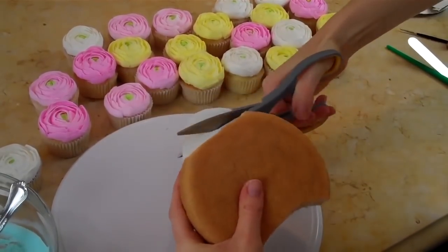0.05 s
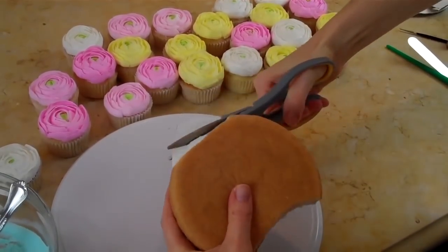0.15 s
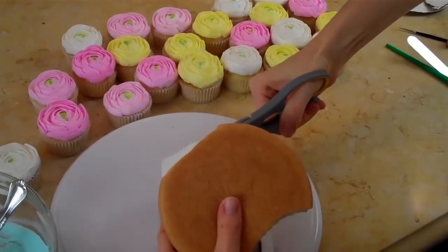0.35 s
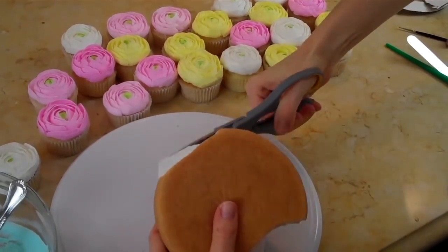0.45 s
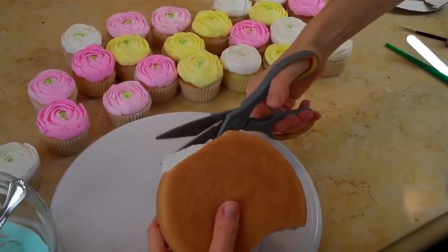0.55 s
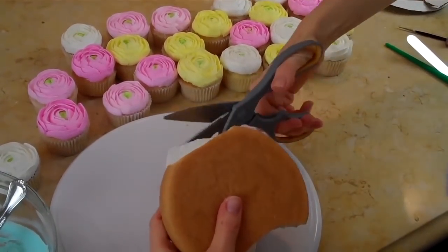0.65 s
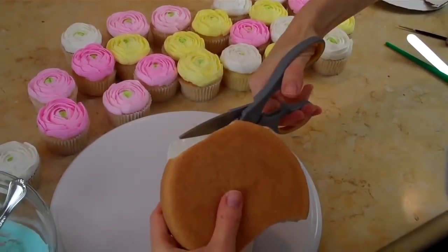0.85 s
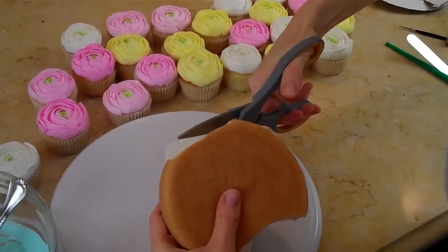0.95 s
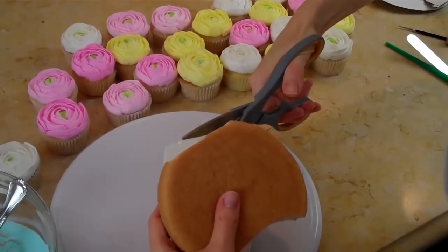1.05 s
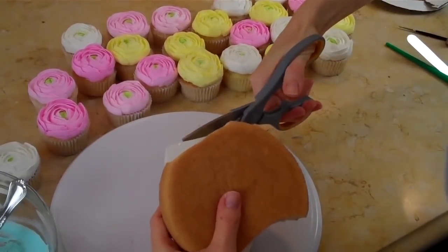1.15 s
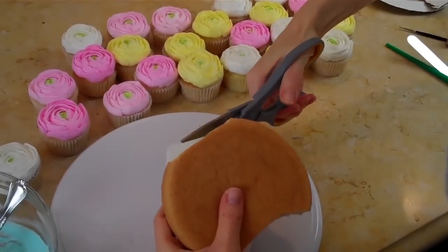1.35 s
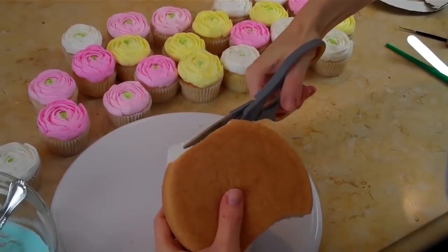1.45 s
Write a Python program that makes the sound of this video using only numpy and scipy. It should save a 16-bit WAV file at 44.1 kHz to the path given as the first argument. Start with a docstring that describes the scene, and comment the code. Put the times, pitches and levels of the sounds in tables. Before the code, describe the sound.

Scissors cut cardboard, close up in a softly humming, lightly reverberant kitchen. A faint crunch from the start grows into cracks and a bright scrape around 0.2-0.3 s, then a loud, sharp metallic clack at 0.32 s. The offcut tumbles onto a plastic platter with hollow knocks and papery scuffs until about 0.63 s. Sparse faint ticks follow, with quiet steely rubbing from 1.1 to 1.5 s.

```python
"""Scissors cutting cardboard

Scissors trim the cardboard under a cake, close by in a kitchen with a steady room tone.
Grains of noise make the crunch and scrape, short bursts the cracks, dying sines the flexing board.
A burst, a pulse and ringing modes clack the blades shut; the offcut knocks and scuffs a plastic platter.
Then faint ticks and nudges, and the rub of the scissors as they reopen and slide into the next cut."""
import sys
import numpy as np
from scipy import signal
from scipy.fft import rfft, irfft
from scipy.io import wavfile

SR = 44100
rng = np.random.default_rng(int(sys.argv[2]) if len(sys.argv) > 2 else 0)


def inscribe(sig):
    """Save sig as 16-bit PCM at rate SR to the path in sys.argv[1].

    A 1-D sig is mono; a 2-D sig holds one channel per row.
    Samples are clipped to [-1, 1] before scaling.
    """
    pcm = np.round(np.clip(np.atleast_2d(sig).T, -1, 1) * 32767)
    wavfile.write(sys.argv[1], SR, pcm.astype(np.int16))


N = 66150  # length of the scene [samples]
RADIATE_HZ = 370  # struck objects radiate little below this
SHARP_RISE_S = 0.00081  # onset of the clack, the scuffs and the ticks
PAPER_SPREAD_DB = 4  # unevenness of the grains in scuffs and ticks


def amp(db):
    """Decibels to gain."""
    return 10 ** (np.asarray(db) / 20)


def unit(x):
    """Scales to rms 1."""
    return x / np.sqrt(np.mean(x ** 2) + 1e-20)


def read(points, hz):
    """Reads a spectrum table on a log-frequency axis."""
    f, value = np.transpose(points)
    return np.interp(np.log(hz + 1), np.log(f + 1), value)


def bins(size=4096):
    """Frequencies on which colours are drawn."""
    return np.fft.rfftfreq(size, 1 / SR)


def add(mix, s, sound):
    """Mixes a sound in at a time."""
    part = mix[..., max(round(s * SR), 0):][..., :sound.shape[-1]]
    part += sound[..., :part.shape[-1]]


def no_bass(x, hz, order=4):
    """High-pass; the order sets its steepness."""
    return signal.sosfilt(signal.butter(order, hz, "high", fs=SR, output="sos"), x)


def colour(x, db):
    """Causal minimum-phase filter of unit energy with the given dB shape."""
    log_gain = np.log(amp(np.r_[db, db[-2:0:-1]]))
    spectrum = np.exp(np.conj(signal.hilbert(log_gain)))
    taps = np.fft.ifft(spectrum).real[:len(db)]
    return signal.fftconvolve(x, taps[None] / np.linalg.norm(taps), axes=1)


def uneven_noise(size, spread_db, most):
    """Common and side noise whose grains vary in size by an exponential draw, capped at most."""
    draw = np.minimum(rng.exponential(1, (2, size)), most)
    return rng.standard_normal((2, size)) * amp(spread_db * draw)


def fibres(size):
    """Two dense trains of tiny snaps of uneven size: the common part and the side part."""
    snaps_per_s, spread_db = 13000, -0.5
    happens = rng.random((2, size)) < snaps_per_s / SR
    return unit(uneven_noise(size, spread_db, 3) * happens)


def stroke(levels, shape):
    """Friction grains under a level curve, coloured by the rubbing surfaces."""
    s, db = np.transpose(levels)
    gain = amp(np.interp(np.arange(N) / SR, s, db))
    return colour(fibres(N) * gain, read(shape, bins()))[:, :N]


def burst(length, rise_s, fade_s, db, spread_db=0, size=2048):
    """A quick cluster of snaps: it rises, holds and fades."""
    t = np.arange(size) / SR
    envelope = np.minimum(t / rise_s, 1) * np.exp(-np.maximum(t - length, 0) / fade_s)
    x = uneven_noise(size, spread_db, 4) * envelope
    energy_match = np.linalg.norm(envelope) / np.linalg.norm(x, axis=1, keepdims=True)
    return amp(db) * x * energy_match


def bursts(rows, shape, rise_s, fade_s, peak_db, octaves, spread_db=0):
    """Short bursts of a shared colour, each with its own broad resonance."""
    out = np.zeros((2, N))
    for s, length, db, hz in rows:
        distance = np.log2((bins() + 1) / hz) / octaves
        peak = peak_db * np.exp(-.5 * distance ** 2)
        snap = burst(length, rise_s, fade_s, db, spread_db)
        add(out, s, colour(snap, read(shape, bins()) + peak))
    return out


def ring(modes):
    """Dying sines of a struck object too small to radiate bass."""
    t = np.arange(SR // 2) / SR
    sines = sum(amp(db - 60 * t / t60) * np.sin(2 * np.pi * hz * t) for hz, db, t60 in modes)
    return no_bass(sines, RADIATE_HZ)


def hush():
    """Steady room tone: coloured noise, partly different in the two ears."""
    # colour of the room tone: (frequency [Hz], level [dB])
    hush_colour = [(10, 4), (25, 6), (60, -4.5), (150, -4.5), (350, -5), (520, 6), (680, -4.5),
                   (1500, -5.5), (4000, -9), (8000, -17.5), (14000, -33.5)]
    level_db, side_db = -65.5, -4.5
    noise = rng.standard_normal((2, N + SR))
    # the first second is dropped so that the filter has settled
    mid, side = amp(level_db) * colour(noise, read(hush_colour, bins()))[:, SR:SR + N]
    return np.array([mid + amp(side_db) * side, mid - amp(side_db) * side])


def crunch():
    """The blades crunch through the fibres: snap noise follows the force on the board."""
    # force of the blades on the board: (time [s], level [dB])
    shear = [(0, -45), (.045, -46), (.1, -56.5), (.15, -53), (.2, -52), (.218, -42.5), (.24, -53),
             (.262, -48.5), (.283, -52), (.3, -72), (.33, -86)]
    # colour of the crunch: (frequency [Hz], level [dB])
    crunch_colour = [(100, -18), (300, -6), (550, 2), (1500, -1), (3000, 3), (5000, -2.5), (6500, -6),
                     (9000, -4), (12000, -15), (14500, -26.5)]
    return stroke(shear, crunch_colour)


def cracks():
    """The board cracks under the blades in short resonant bursts."""
    # cracks: (time [s], length [s], level [dB], brightest frequency [Hz])
    crack_rows = [(.1212, 0.0047, -45, 7260), (.158, 0.0045, -53.5, 3020), (.1743, 0.0018, -36.5, 3150),
                  (.1922, 0.0034, -41.5, 3350), (.203, 0.0069, -29, 5570), (.2054, 0.00058, -21.5, 3100),
                  (.2253, 0.0014, -30.5, 6800), (.3152, 0.0012, -26.5, 4025), (.3175, 0.0049, -21.5, 5900)]
    # colour of a crack: (frequency [Hz], level [dB])
    crack_colour = [(80, -33), (400, -10.5), (950, -5), (1400, -6.5), (2300, -5.5), (3300, 1), (4500, -3),
                    (7000, -3.5), (10000, -6.5), (13000, -14), (15000, -19)]
    return bursts(crack_rows, crack_colour, rise_s=0.00057, fade_s=0.0034, peak_db=6, octaves=0.28)


def scrape():
    """The edges scrape through the board, slipping in a narrow band of friction noise."""
    # scrape: (time [s], level [dB])
    scrape_levels = [(.2, -67.5), (.215, -41.5), (.24, -37), (.257, -43), (.263, -47), (.27, -42),
                     (.28, -43), (.296, -48.5), (.315, -83)]
    # colour of the scrape: (frequency [Hz], level [dB])
    scrape_colour = [(500, -39), (3500, -17), (5100, -2), (6500, -10.5), (10000, -10.5), (14000, -23.5)]
    return stroke(scrape_levels, scrape_colour)


def short_rings():
    """Short dying sines with a soft onset: the board flexes as it splits, then the clacking blades ring."""
    # flexes of the board and, in the last row, a quick 2.6 kHz ring of the clacking blades:
    # (time [s], pitch [Hz], level [dB], t60 [s])
    ring_rows = [(0.2045, 938, -27, 0.049), (0.2066, 1134, -34, 0.025), (0.3223, 1960, -7, .011),
                 (0.3245, 2620, -11, 0.011)]
    rise_s = 0.002
    out = np.zeros((2, N))
    t = np.arange(SR // 2) / SR
    for s, hz, db, t60 in ring_rows:
        add(out[0], s, ring([(hz, db, t60)]) * np.minimum(t / rise_s, 1))
    return out


def clack():
    """The blades clack shut: a bright burst, a brief pressure push and the ringing of the scissors."""
    # colour of the clack: (frequency [Hz], level [dB])
    clack_colour = [(40, -22), (450, -16), (800, -8.5), (1200, 0.5), (1500, -3), (2600, 4), (3200, -2.5),
                    (3900, 6.5), (4700, -1), (6300, -3.5), (7400, 1.5), (8900, -5.5), (10200, 1),
                    (12000, -7.5), (14500, -37)]
    # ringing of the scissors: (frequency [Hz], level [dB], t60 [s])
    blades = [(790, 3, .09), (1200, -5, .05), (2010, -1, .1), (2692, -2, .08), (3801, -7, .2),
              (3942, 1, .06), (5188, -3, .07), (5578, -3, .07), (6965, -4, .07), (7605, -5, .11),
              (8317, -10, .12), (9625, -6, .1)]
    shut_s, ring_db = .3241, -35.5
    push_width_s, push_db, push_side_db = 0.00013, -31.5, -4
    out = np.zeros((2, N))
    snap = burst(0.0025, SHARP_RISE_S, fade_s=0.00054, db=-11.8)
    add(out, shut_s, colour(snap, read(clack_colour, bins())))
    add(out[0], shut_s, amp(ring_db) * ring(blades))
    t = np.arange(SR // 2) / SR
    push = t / push_width_s * np.exp(1 - t / push_width_s)
    add(out, shut_s, amp(push_db) * np.array([push, -amp(push_side_db) * push]))
    return out


def knocks():
    """Each landing gives a short hollow knock, pitched by where the card strikes, and rings the platter."""
    # knocks as the offcut tumbles and settles: (time [s], level [dB], pitch [Hz], rise [s])
    knock_rows = [(.3675, -30, 575, 0.00074), (.3745, -29.5, 485.5, 0.0051), (.406, -42, 535, 0.0018),
                  (.4145, -29.5, 560, 0.0041), (.4485, -30.5, 557, 0.0052), (.478, -42.5, 494, .003),
                  (.5392, -35.5, 589, 0.00042), (.5555, -37.5, 548, 0.0037), (.5615, -30.5, 566.4, 0.0031),
                  (.6262, -47, 595, 0.00096), (.8262, -52.5, 551, .002), (1.311, -56, 585, .002)]
    # ringing of the platter: (frequency [Hz], level [dB], t60 [s])
    platter_modes = [(367, -14, 0.071), (489.6, -20, 0.12), (533, -31.5, 0.11), (658, -22.5, 0.085),
                     (767, -12.5, 0.092), (1005, -18.5, 0.12), (1247, -13, 0.055)]
    knock_t60_s = .052
    out, platter = np.zeros((2, N)), ring(platter_modes)
    t = np.arange(len(platter)) / SR
    for s, db, hz, rise_s in knock_rows:
        hollow = ring([(hz, 0, knock_t60_s)])
        add(out[0], s, amp(db) * np.minimum(t / rise_s, 1) * (hollow + platter))
    return no_bass(out, RADIATE_HZ)


def scuffs():
    """The edges of the tumbling card scuff the platter in crisp, papery grains."""
    # scuffs: (time [s], length [s], level [dB], brightest frequency [Hz])
    scuff_rows = [(.376, 0.00085, -39, 5040), (.384, 0.0012, -34.5, 5800), (.387, .001, -34, 2000),
                  (.4063, 0.0014, -34, 2350), (.41, 0.0024, -39, 3160), (.422, 0.0025, -38.5, 2180),
                  (.4442, 0.0032, -31.5, 2100), (.446, 0.00072, -33.5, 4770), (.4502, 0.00146, -34.5, 2770),
                  (.4535, 0.0007, -47, 3400), (.459, 0.0023, -39.5, 2960), (.47, 0.0033, -52, 2600),
                  (.5157, 0.0025, -48.5, 2630), (.5393, 0.0019, -39, 7150), (.556, 0.0032, -43, 2210),
                  (.5607, 0.0037, -42.5, 2700), (.5675, .001, -37.5, 2400), (.573, 0.0085, -48.5, 2430),
                  (.6093, 0.00057, -51, 2330), (.627, .001, -49.5, 5580)]
    # colour of a scuff: (frequency [Hz], level [dB])
    scuff_colour = [(80, -39), (250, -17), (550, -5.5), (900, 1.5), (1250, 6.5), (1500, 1.5), (2000, 8),
                    (3000, 2), (5000, 3), (9000, -10.5), (14000, -27)]
    return bursts(scuff_rows, scuff_colour, SHARP_RISE_S, fade_s=0.0023, peak_db=7.5, octaves=0.42,
                  spread_db=PAPER_SPREAD_DB)


def ticks():
    """Small ticks of the board and the handles: faint bursts with a strong broad resonance."""
    # ticks: (time [s], length [s], level [dB], brightest frequency [Hz])
    tick_rows = [(.728, 0.0019, -56.5, 3030), (.7525, 0.0023, -58, 3260), (.757, .002, -67, 3470),
                 (.8052, 0.0024, -60.5, 7880), (.8262, 0.0017, -54.5, 3250), (.8305, 0.0016, -58, 2730),
                 (.872, 0.003, -60, 3480), (.931, 0.0012, -60.5, 3450), (.9655, .003, -64, 3060),
                 (.973, .001, -60, 3000), (.995, 0.0016, -64.5, 2510), (1.078, 0.0015, -63.5, 6800),
                 (1.0935, .0015, -58, 2950), (1.137, 0.0028, -57, 1500), (1.1555, 0.0012, -55, 1800),
                 (1.39, 0.0013, -56.5, 6130), (1.434, 0.0018, -55, 10300), (1.4645, .0035, -52.5, 9500)]
    # colour of a tick: (frequency [Hz], level [dB])
    tick_colour = [(100, -9), (550, -8), (1000, 14.5), (4000, 3.5), (9000, -3.5), (14000, -13)]
    return bursts(tick_rows, tick_colour, SHARP_RISE_S, fade_s=.0015, peak_db=26.5, octaves=0.84,
                  spread_db=PAPER_SPREAD_DB)


def nudges():
    """The blades nudge the board and set its modes ringing."""
    # nudges: (time [s], level [dB])
    nudge_rows = [(.8055, -59.5), (1.136, -58), (1.145, -56.5), (1.157, -59), (1.272, -59.5),
                  (1.334, -59.5)]
    # ringing of the board: (frequency [Hz], level [dB], t60 [s])
    board_modes = [(510, -6.5, 0.071), (811, -1.5, 0.037), (935, 0.5, 0.035), (1365, -4, 0.067),
                   (1766, -5, .03)]
    out, board = np.zeros((2, N)), ring(board_modes)
    for s, db in nudge_rows:
        add(out[0], s, amp(db) * board)
    return out


def slide():
    """The blades rub as they reopen and slide on: steely friction noise."""
    # slide: (time [s], level [dB])
    slide_levels = [(1.04, -88), (1.09, -71), (1.155, -64), (1.215, -72), (1.265, -58), (1.31, -71),
                    (1.37, -70.5), (1.44, -65), (1.5, -63.5)]
    # colour of the rubbing steel: (frequency [Hz], level [dB])
    steel_colour = [(60, 5.5), (250, 3), (1000, -10.5), (3000, 0.5), (5000, -0.5), (7800, -3.5),
                    (8800, 1.5), (10000, -5.5), (14000, -22.5)]
    return stroke(slide_levels, steel_colour)


def microphones(x):
    """Common and side parts become left and right, tilted in level and phase by frequency."""
    # side part of near sounds: (frequency [Hz], level [dB])
    width = [(60, -3), (200, -4.5), (500, -24), (1500, -30.5), (4000, -15.5), (7000, -7.5), (11000, -6.5)]
    # left minus right: (frequency [Hz], level [dB])
    lean = [(500, -0.5), (4000, 1), (7500, -3.5), (12000, 0.5)]
    # phase by which the left microphone leads: (frequency [Hz], phase [rad])
    lead = [(1500, 0), (4500, 0.28), (7500, 1.5), (9000, 1.15), (12000, 1.5)]
    hz = bins(size=2 * N)
    mid, side = rfft(x, 2 * N)
    side = side * amp(read(width, hz))
    # each ear takes half of the level and phase difference
    tilt = amp(read(lean, hz) / 2) * np.exp(.5j * read(lead, hz))
    return irfft([(mid + side) * tilt, (mid - side) / tilt])[:, :N]


def room(x, gap_s=0.00067, alike_hz=1500, size=256):
    """Dense reflections, alike in both ears in the bass, each band dying at its own rate."""
    # reverberation: (frequency [Hz], t60 [s])
    decay = [(100, 0.23), (500, 0.85), (2000, 0.33), (4500, 0.36), (8000, 0.37), (14000, 0.18)]
    hz, t, z = signal.stft(rng.standard_normal((2, SR)), SR, nperseg=size)
    mid, side = z * amp(-60 * t / read(decay, hz)[:, None])
    # the ears turn from identical in the bass to independent in the treble
    turn = np.pi / 4 * (1 - np.exp(-hz[:, None] / alike_hz))
    common, apart = mid * np.cos(turn), side * np.sin(turn)
    tail = signal.istft(np.array([common + apart, common - apart]), SR, nperseg=size)[1]
    tail = tail * np.minimum(np.arange(tail.shape[1]) / SR / gap_s, 1)
    send = no_bass(x, 240, order=2)
    return signal.fftconvolve(send[None], tail / np.linalg.norm(tail[0]), axes=1)[:, :N]


def scene():
    """The near sounds, their reverberation and the room tone; the cut also radiates sideways to the walls."""
    tone = hush()
    cut = crunch() + cracks() + scrape() + short_rings() + clack()
    knock, scuff = knocks(), scuffs()
    handling = ticks() + nudges() + slide()
    # reverberation sends [dB]
    cut_db, aside_db, knock_db, scuff_db, handling_db = -11.5, -10.5, -10.5, -4.5, -2.5
    send = amp(cut_db) * cut[0] + amp(knock_db) * knock[0]
    send += amp(scuff_db) * scuff[0] + amp(handling_db) * handling[0]
    aside = amp(aside_db) * cut[1]
    near = microphones(cut + knock + scuff + handling)
    return near + room(send) + room(aside) + tone


def record(dry):
    """The loudest peaks are rounded off; then the recorder's band limit."""
    ceiling, edge_hz = .68, 14300  # ceiling as a fraction of full scale
    rounded = dry / (1 + (dry / ceiling) ** 6) ** (1 / 6)
    low_pass = signal.firwin(201, edge_hz, window=("kaiser", 8), fs=SR)
    return signal.oaconvolve(rounded, low_pass[None], "same")


dry = scene()
out = record(dry)
inscribe(out)
```